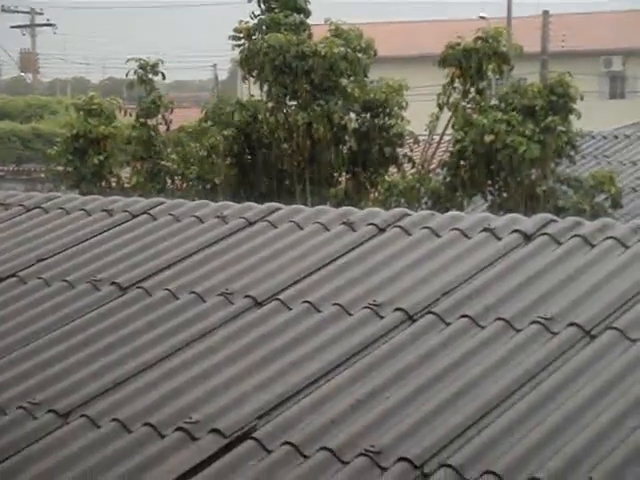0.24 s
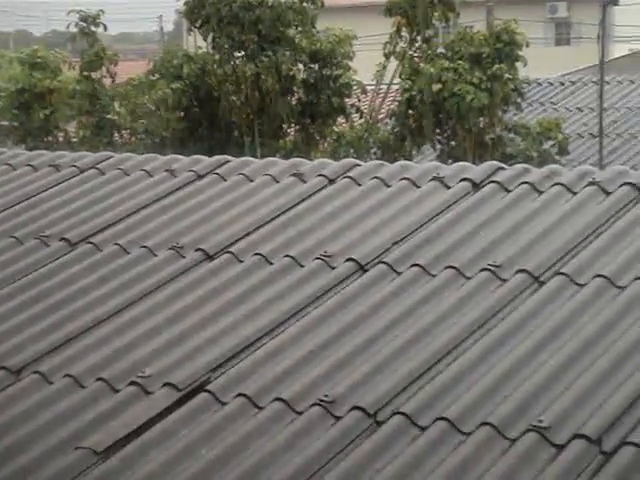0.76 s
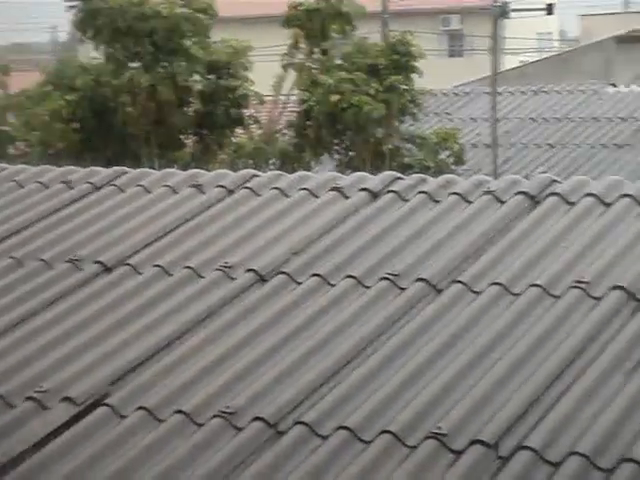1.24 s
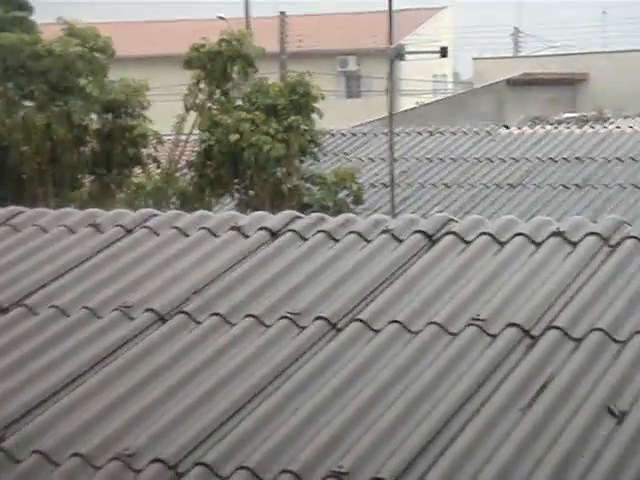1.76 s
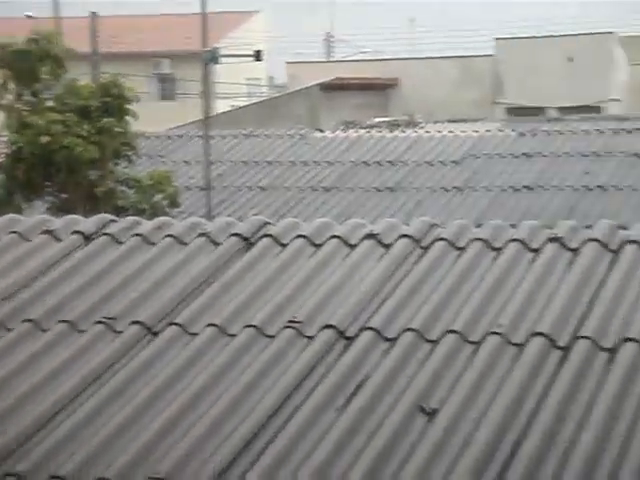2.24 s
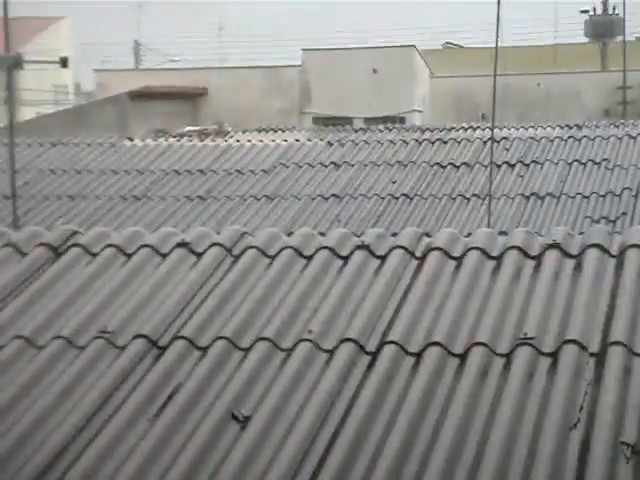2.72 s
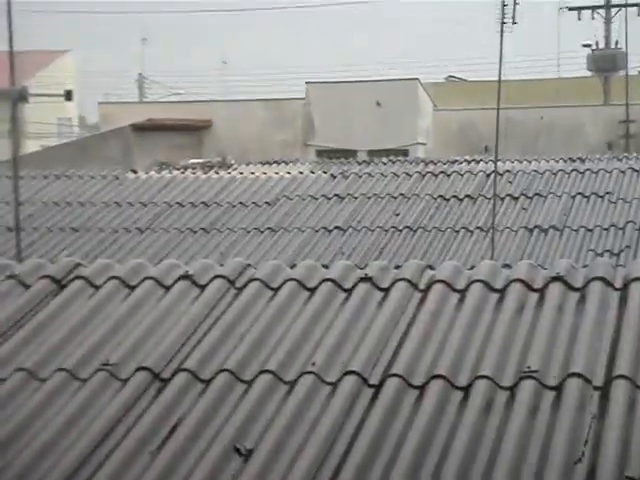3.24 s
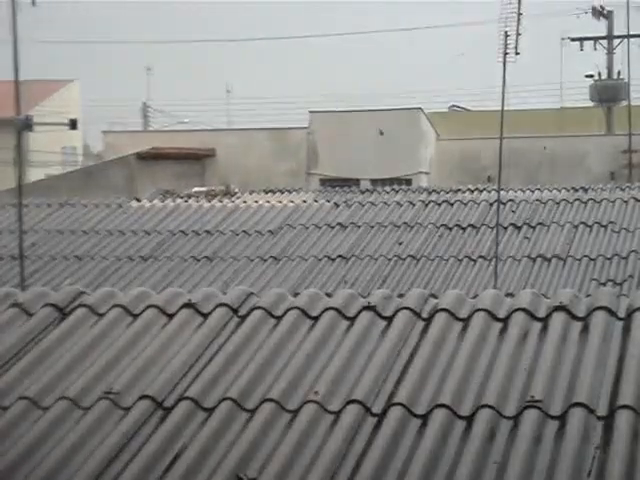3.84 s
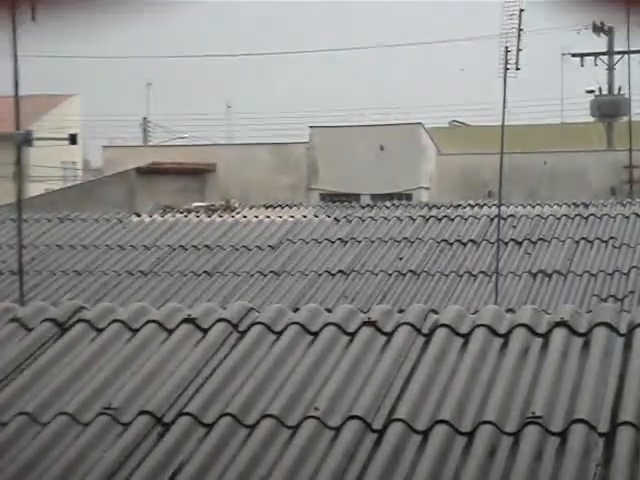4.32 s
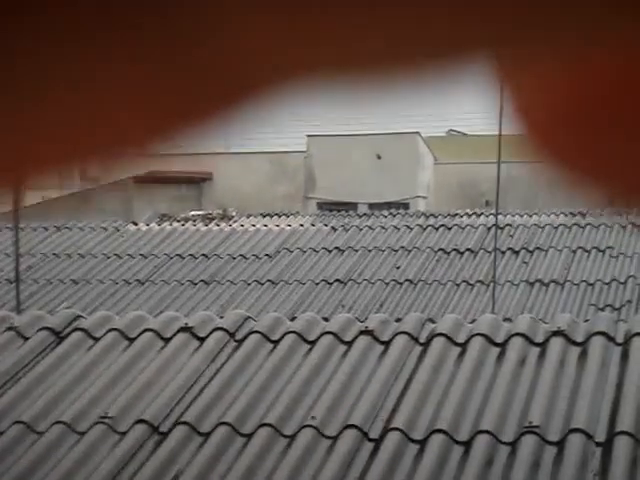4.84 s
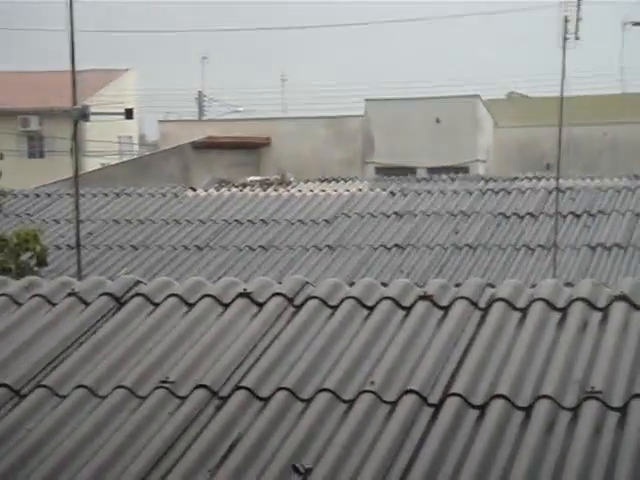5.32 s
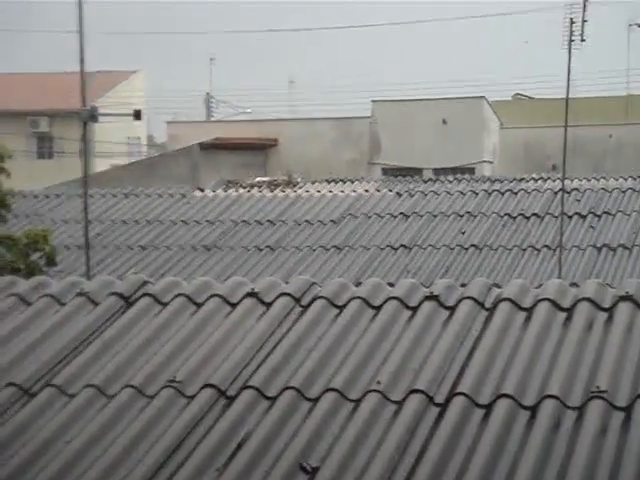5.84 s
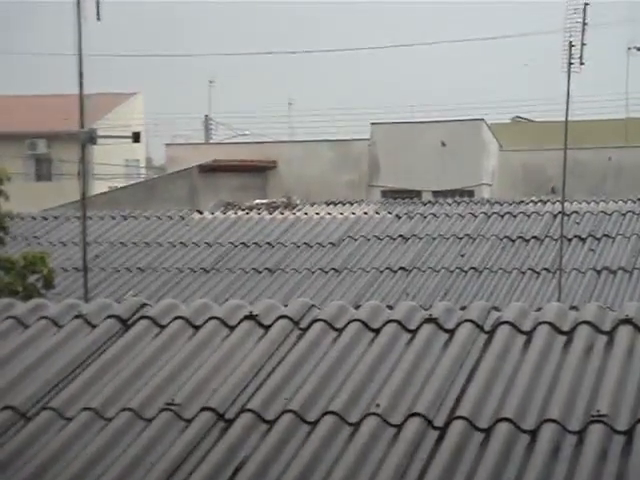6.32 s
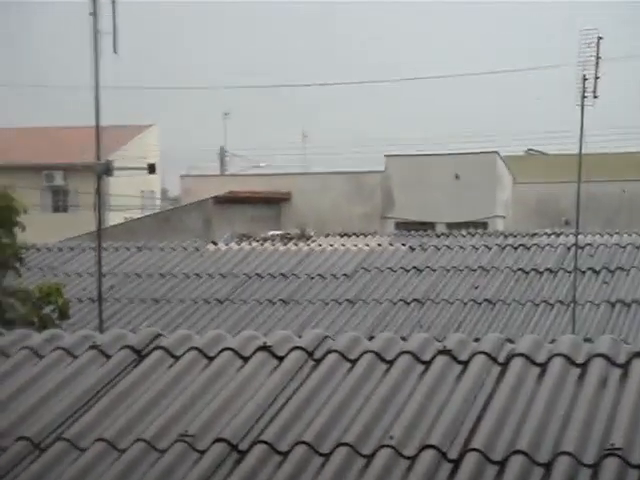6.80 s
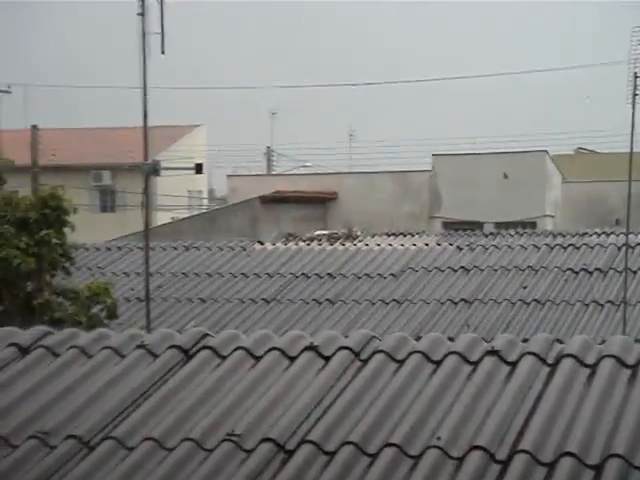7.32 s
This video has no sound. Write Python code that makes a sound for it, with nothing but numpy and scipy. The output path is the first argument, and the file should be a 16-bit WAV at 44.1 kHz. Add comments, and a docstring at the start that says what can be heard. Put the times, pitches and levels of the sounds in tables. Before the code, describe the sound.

Rain falls without pause on corrugated roof sheets, captured through a small, rough camera microphone at a window. From 0 to 2.5 seconds it is a moderate, even wash: far roofs drumming in the middle range with fine hiss above, scattered light ticks, and a very faint low rumble. A hard crack with a body knock lands near 1.4, a softer bump near 1.6, a low distant boom swells around 2.0, and a dull knock follows at 2.2. From about 2.9 to 3.3 the near patter rises quickly, thick and muffled, then brightens until about 4.5. From then to the end at about 7.5 it stays loud, crisp and dense, fluctuating in small spatters, with large drops snapping several times a second as short ringing ticks. Little bumps come near 5.0 and 6.7. Treble flickers; the sharpest peaks clip.

```python
"""Steady rain on corrugated roof sheets, heard from a window by a small camera. The patter on the near sheets,
noise mixed with many tiny damped tones, comes up dull, then bright, as the camera turns. Far roofs drum and
hiss in the same way, and low noise rumbles far off. Large drops crack close by as short ringing ticks; the
microphone's membrane is pushed now and then, and knocks shake the camera. The treble flickers and the loudest
peaks clip."""
import sys
import numpy as np
from scipy import signal
from scipy.fft import rfft, irfft, next_fast_len
from scipy.io import wavfile
from scipy.ndimage import uniform_filter1d, map_coordinates

SR = 44100
rng = np.random.default_rng(int(sys.argv[2]) if len(sys.argv) > 2 else 0)


def generate_wav(signal):
    """Clip the signal to [-1, 1] and save it as 16-bit WAV at the path in sys.argv[1]."""
    frames = np.transpose(np.atleast_2d(signal))
    scaled = np.clip(frames, -1, 1) * 32767
    pcm = np.round(scaled).astype(np.int16)
    wavfile.write(sys.argv[1], SR, pcm)


def rack_gain(trim_db):
    """Turn a fader trim in dB into the linear factor to multiply a signal by."""
    fader = np.asarray(trim_db, float)
    return 10 ** (fader / 20)


N = 333396  # length in samples


def unit(x):
    """Scale to rms 1."""
    return x / np.sqrt(np.mean(x ** 2) + 1e-20)


def curves(rows, t):
    """Read each column after the time at times t, in straight lines between rows."""
    s, *columns = np.transpose(rows)
    return [np.interp(t, s, column) for column in columns]


def wobble(rate):
    """A smooth random curve, with this many random points a second."""
    points = rng.standard_normal(int(N * rate / SR) + 4)
    return map_coordinates(points, [np.arange(N) * rate / SR])


def filtered(x, response):
    """Multiply the spectrum of x by a response, a function of frequency in Hz."""
    m = next_fast_len(N + 8192)
    spectrum = rfft(x, m) * response(np.fft.rfftfreq(m, 1 / SR))
    return irfft(spectrum, m)[..., :N]


def coloured(x, colour):
    """Filter x through pitch and level points, joined on a log pitch axis, then scale to rms 1."""
    f, db = np.transpose(colour)
    return unit(filtered(x, lambda hz: rack_gain(np.interp(np.log(hz + 1), np.log(f), db))))


def splashes(at, size, hz, cycles, width=160):
    """One damped sine per drop: it peaks almost at once and dies away over some cycles of its pitch."""
    turns = hz[:, None] * np.arange(width) / SR
    attack = 1 - np.exp(-3 * turns)
    decay = np.exp(-2 * turns / cycles[:, None])
    wave = np.sin(2 * np.pi * turns) * attack * decay
    wave *= (size / np.abs(wave).max(axis=1))[:, None]
    index = np.round(at * SR).astype(int)[:, None] + np.arange(width)
    return np.bincount(index.ravel(), wave.ravel(), N + 2 * width)[:N]


def shower(count, low_hz, high_hz, cycles, spread_db, wash, patchy_db):
    """Many drops of random pitch, mixed with the noise wash of those too far to tell apart."""
    draw = rng.random((count, 3))
    size = rack_gain(-spread_db * np.log(.01 + draw[:, 1]))
    hz = low_hz * (high_hz / low_hz) ** draw[:, 2]
    drops = splashes(draw[:, 0] * N / SR, size * np.sqrt(hz), hz, np.full(count, cycles))
    share = np.clip(wash, 0, 1)  # the wash's share of the power
    x = np.sqrt(share) * rng.standard_normal(N) + np.sqrt(1 - share) * unit(np.gradient(drops))
    # uneven patches in time and pitch
    z = signal.stft(x, nperseg=256)[2]
    field = uniform_filter1d(rng.standard_normal(z.shape), size=9, axis=0)
    field = uniform_filter1d(field, size=5, axis=1)
    return signal.istft(z * rack_gain(patchy_db * unit(field)), nperseg=256)[1][:N]


def swells(at, db):
    """Gain in dB: a sudden rise as the drops land, a slower fall, a lull on both sides."""
    rise_s, fall_s = .0006, .0095
    lull_s = .14  # drops that bunch leave the rain thinner around them
    u = np.arange(SR // 10) / SR
    shape = (1 - np.exp(-u / rise_s)) * np.exp(-u / fall_s)
    marks = np.bincount(np.round(at * SR).astype(int), db, N)
    swell = signal.fftconvolve(marks, shape / shape.max())[:N]
    return swell - uniform_filter1d(swell, size=round(lull_s * SR))


def clusters():
    """Small spatters at random, of uneven size."""
    per_s, scale_db = 50, 1.4
    draw = rng.random((round(per_s * N / SR), 2))
    size_db = -scale_db * np.log(.1 + .9 * draw[:, 1])
    return swells(draw[:, 0] * (N - 1) / SR, size_db)


# large spatters, when several drops land together: start_s, swell_db (before the lull is taken off)
SPATTER_SWELLS = [(0.607, 4.0), (0.968, 3.0), (0.985, 4.0), (1.119, 3.0), (1.234, 3.0), (1.398, 3.0),
                  (1.584, 6.5), (1.596, 4.5), (1.93, 3.0), (1.965, 3.0), (2.189, 3.5), (2.249, 4.0),
                  (2.561, 4.0), (2.66, 4.0), (2.692, 3.0), (2.714, 3.0), (2.925, 3.0), (2.957, 3.0),
                  (3.107, 4.0), (3.127, 4.5), (3.151, 2.5), (3.485, 4.5), (3.582, 3.0), (3.82, 3.0),
                  (3.848, 3.5), (3.865, 5.5), (3.927, 3.0), (3.966, 5.0), (4.088, 2.5), (4.11, 3.0),
                  (4.158, 3.0), (4.198, 3.0), (4.38, 3.5), (4.405, 3.5), (4.46, 3.0), (4.563, 3.5),
                  (4.585, 4.5), (4.644, 4.0), (5.057, 4.5), (5.079, 5.5), (5.128, 3.0), (5.211, 2.5),
                  (5.247, 3.0), (5.353, 3.0), (5.405, 3.5), (5.466, 2.5), (5.468, 1.5), (5.492, 2.5),
                  (5.527, 3.0), (5.58, 3.5), (5.598, 5.0), (5.776, 3.0), (5.854, 3.5), (5.907, 4.5),
                  (5.981, 3.0), (6.082, 3.5), (6.109, 3.5), (6.139, 3.0), (6.2, 5.0), (6.231, 4.5),
                  (6.296, 3.0), (6.367, 3.0), (6.432, 4.0), (6.58, 3.0), (6.653, 5.5), (6.664, 3.0),
                  (6.693, 2.5), (6.767, 3.0), (6.813, 4.0), (6.831, 3.0), (6.852, 2.5), (6.967, 4.0),
                  (7.009, 3.0), (7.073, 5.5), (7.159, 3.5), (7.192, 3.0), (7.206, 3.5), (7.224, 3.0),
                  (7.285, 2.5), (7.351, 3.0), (7.368, 5.0)]


def spatters(t):
    """Gain in dB of the large spatters."""
    return swells(*np.transpose(SPATTER_SWELLS))


# colour of the distant rumble: pitch_hz, level_db (relative)
RUMBLE_COLOUR = [(12, -12), (30, -11), (50, -12), (65, 3), (85, -5.5), (130, -6.5), (200, -24.5)]


def rumble(t):
    """Low noise from far off, wavering and fading slowly, with one boom."""
    start_db, fade_db_per_s, waver_db = -48.5, 0.2, 3
    boom_s, boom_db, rise_s, fall_s = 2, 16.5, .1, .3
    boom = np.interp(t, [boom_s - rise_s, boom_s, boom_s + fall_s], [0, 1, 0])
    level_db = start_db - fade_db_per_s * t + waver_db * wobble(2.1) + boom_db * boom
    return rack_gain(level_db) * coloured(rng.standard_normal(N), RUMBLE_COLOUR)


# pushes on the microphone's membrane, most as loud drops land: start_s, level_db (scales the push shape)
PUSHES = [(1.3633, -25), (1.5605, -19.5), (2.006, -29), (2.537, -30), (4.001, -25), (4.028, -20),
          (4.11, -34), (4.985, -20), (5.127, -21), (5.49, -29), (5.56, -27), (5.579, -31), (5.6, -27),
          (5.854, -30), (5.905, -29), (5.92, -28), (6.03, -29), (6.048, -27), (6.109, -30), (6.136, -31),
          (6.198, -29), (6.318, -30), (6.43, -26), (6.652, -30), (6.744, -29), (6.81, -31), (6.829, -31),
          (7.071, -30), (7.158, -25.5), (7.366, -35), (7.513, -29)]
# knocks on the camera body: start_s, level_db (scales the knock shape)
BODY_KNOCKS = [(1.3642, -8.5), (1.5597, -17), (2.2325, -10.5), (4.984, -18), (6.7435, -16)]


def jolts():
    """The membrane is pushed and creeps back; a knock shakes the camera body for about one cycle."""
    t = np.arange(SR // 8) / SR
    push = (1 - np.exp(-t / 0.0013)) * np.exp(-t / 0.012) * (1 - t / 0.021)
    turns = 200 * t + .4 * (1 - np.exp(-t / .0006))  # the pitch sinks to 200 Hz as the contact widens
    knock = -np.sin(2 * np.pi * turns) * np.exp(-(t / 0.0034) ** 2)

    def place(rows, shape):
        """Set a scaled copy of the shape at each start."""
        at, db = np.transpose(rows)
        marks = np.bincount(np.round(at * SR).astype(int), rack_gain(db), N)
        return signal.fftconvolve(marks, shape)[:N]

    return place(PUSHES, push), place(BODY_KNOCKS, knock)


# colour of the drumming far sheets: pitch_hz, level_db (relative, per Hz)
DRUM_COLOUR = [(60, -36), (110, -17), (140, -7.5), (185, -12), (270, -4.5), (550, 0), (700, -1), (860, 0.5),
               (1100, -1), (1400, -5), (2000, -10.5), (4000, -21)]
# colour of the hissing spray: pitch_hz, level_db (relative, per Hz)
HISS_COLOUR = [(2500, -26), (4500, -4), (6000, 0.5), (7000, -3), (8500, -7), (10000, -15), (12000, -47)]


def far_roofs(t, gust):
    """The sheets drum in the middle range; the spray hisses above; both swell a little with the near patter."""
    # levels while the camera faces away, and the share of the near patter's rise that each follows
    away_drum_db, drum_follows = -22, 0.024
    away_hiss_db, hiss_follows = -27, 0.34
    rise_db = curves(NEAR_PATTER, t)[0] - NEAR_PATTER[0][1]
    drum = shower(count=9000, low_hz=491, high_hz=2424, cycles=3.25, spread_db=1.0, wash=0.9, patchy_db=-0.33)
    hiss = shower(count=5000, low_hz=3960, high_hz=9940, cycles=2.9, spread_db=-1.5, wash=0.75, patchy_db=-0.06)
    drum_db = away_drum_db + drum_follows * rise_db + 0.67 * wobble(2.5)
    drum_db = drum_db + 0.77 * gust + .5 * spatters(t)
    hiss_db = away_hiss_db + hiss_follows * rise_db + 1.1 * wobble(2.3) + 0.34 * wobble(12)
    hiss_db = hiss_db + .5 * gust + 1.0 * spatters(t)
    return rack_gain(drum_db) * coloured(drum, DRUM_COLOUR) + rack_gain(hiss_db) * coloured(hiss, HISS_COLOUR)


TICK_S = .00037  # every tick dies away over this time, whatever its pitch


def lesser_drops():
    """Smaller ticks at random, a few dozen a second, their peaks standing over the near patter."""
    per_s, most_db, low_hz, high_hz = 24, 8, 2500, 7500
    draw = rng.random((round(per_s * N / SR), 3))
    at = draw[:, 0] * N / SR
    hz = low_hz * (high_hz / low_hz) ** draw[:, 1]
    peak_db = curves(NEAR_PATTER, at)[0] + most_db - 5.3 * draw[:, 2]
    return splashes(at, -rack_gain(peak_db), hz, TICK_S * hz)


# large drops landing close by, and the sharp crack that opens the knocks at 1.365 s and 1.561 s: start_s,
# level_db (peak of the tick alone), pitch_hz
BIG_DROPS = [(0.5994, -7.0, 5600), (0.7241, -5.0, 7040), (0.9838, -7.5, 4530), (1.365, -8, 1550),
             (1.371, 2.5, 2800), (1.5608, -11, 750), (1.5822, -8.5, 4310), (1.5862, -9, 4440),
             (1.5965, -4.5, 5500), (2.1884, -9, 2500), (2.5611, -8, 1590), (2.6573, -6.0, 2300),
             (3.1061, -7, 1810), (3.1289, -7, 1850), (3.4846, -6, 1980), (3.6039, -6, 2150),
             (3.6913, -6, 2330), (3.8188, -5, 2630), (3.8646, -2.0, 3250), (3.8856, -5, 1940),
             (3.9542, -4, 1890), (3.9657, -3.5, 3220), (4.028, -5.0, 7000), (4.0876, -3.5, 4540),
             (4.11, -1.5, 3410), (4.2015, -4, 3750), (4.293, -3, 4050), (4.3001, -4, 6720),
             (4.4048, -3.5, 3920), (4.584, 0.0, 3420), (4.6441, -2.0, 3400), (4.887, -3, 2970),
             (4.914, -3, 5040), (4.9845, 0.0, 1810), (5.079, -2.5, 3390), (5.1283, -2.5, 4900),
             (5.2481, -3.5, 2240), (5.3525, -2.5, 3400), (5.404, -3.0, 4300), (5.4905, -1.5, 4500),
             (5.5793, -2.5, 4390), (5.5967, -3.5, 2760), (5.775, -3.5, 4310), (5.8536, -1.0, 3430),
             (5.9077, -4, 3140), (6.0303, -2.5, 3320), (6.0488, -1.0, 4070), (6.1088, -2.5, 3420),
             (6.1407, -2.5, 2030), (6.1955, -3.5, 4600), (6.1998, -0.5, 3760), (6.23, -1.0, 3460),
             (6.318, -4.0, 7300), (6.3661, -5, 3750), (6.371, -9, 9000), (6.4317, -1.5, 3470),
             (6.4954, -4.5, 4180), (6.5008, -4.0, 2270), (6.578, -3, 2760), (6.6531, 0, 3200),
             (6.6911, -3, 3960), (6.783, -2.5, 5200), (6.811, -1.5, 4800), (6.8295, -1.5, 5600),
             (6.968, -2.0, 2820), (7.03, -3.5, 4690), (7.072, -3.0, 2910), (7.0748, -3, 3320),
             (7.114, -3.5, 2240), (7.159, -2.5, 4180), (7.1693, -2.5, 5340), (7.176, -3, 5860),
             (7.2834, -3, 4130), (7.3432, -2.5, 3700), (7.3507, -2.0, 3240), (7.3679, 0.0, 3140),
             (7.4342, -3.5, 5430), (7.5153, -3.0, 4720)]


def large_drops():
    """A sharp tick at the drop's pitch and its short ring over a thud, then a few ms of splash."""
    ring_db, ring_s = -9, .0018  # ring level against the tick, for high drops
    dry_hz = 2900  # well below this pitch a drop hardly rings
    at, db, hz = np.transpose(BIG_DROPS)
    tick = splashes(at - .5 / hz, -rack_gain(db), hz, TICK_S * hz)
    # the sheet drums
    thud = splashes(at - .0003, rack_gain(db - 12.5), np.full(len(at), 900), np.full(len(at), 2.5))
    ring_size = rack_gain(db + ring_db) / (1 + (dry_hz / hz) ** 12)
    ring = splashes(at + .5 / hz, -ring_size, hz, ring_s * hz, width=240)
    # six droplets splash after each drop
    draw = rng.random((len(at), 6, 2))
    later = (at[:, None] + .0006 + 0.0066 * draw[..., 0]).ravel()
    pitch = (hz[:, None] * np.exp(1.1 * (draw[..., 1] - .5))).ravel()
    splash = splashes(later, np.repeat(rack_gain(db - 28.0), 6), pitch, np.full(len(later), 4.5))
    return tick + ring + thud + splash


# near patter as the camera turns to it: start_s, level_db (before shading and swells),
# edge_hz (pitch up to which it reaches the microphone)
NEAR_PATTER = [(0, -24.5, 7500), (2.5, -25, 6700), (2.8, -24.5, 4970), (2.95, -22, 3060), (3.12, -18, 2720),
               (3.28, -18, 2850), (3.45, -17, 3480), (3.65, -18.5, 3600), (3.85, -18, 4900),
               (4.1, -16.5, 7000), (4.5, -16, 9100), (4.85, -16.5, 9000), (5.45, -15, 9000),
               (5.7, -16.5, 9000), (6.05, -15.5, 9000), (6.55, -18, 9000), (6.85, -15.5, 9000),
               (7.56, -16, 9000)]
# colour of the near patter: pitch_hz, level_db (relative, per Hz)
PATTER_COLOUR = [(500, -25), (1200, -4), (1600, -1.5), (3000, 0.5), (5300, -2.5), (7000, -10), (9000, -33),
                 (12000, -40)]


def near_sheets(t, gust):
    """Drops patter on the sheets; the window edge shades their treble until the camera faces them."""
    patter = shower(count=7000, low_hz=1210, high_hz=7500, cycles=3.1, spread_db=0.0, wash=0.87, patchy_db=-0.67)
    hz, when, z = signal.stft(coloured(patter, PATTER_COLOUR), SR, nperseg=512)
    edge_hz = curves(NEAR_PATTER, when)[1]
    shade = 1 / np.sqrt(1 + (hz[:, None] / edge_hz) ** 8)
    shaded = signal.istft(z * shade, SR, nperseg=512)[1][:N]
    return rack_gain(curves(NEAR_PATTER, t)[0] + 1.0 * gust) * shaded


def scene():
    """All the sounds at one microphone; the same small clusters swell the rain near and far."""
    t, gust = np.arange(N) / SR, clusters()
    rain = far_roofs(t, gust) + rack_gain(spatters(t)) * near_sheets(t, gust)
    push, knock = jolts()
    deafness = np.exp(-9 * np.abs(push))  # a membrane off its centre hears less of the rain
    return (deafness * rain + rumble(t) + large_drops() + lesser_drops() + push + knock)[None]


def flicker(x, above_hz, rarity, depth_db):
    """Patches of the treble, about 10 ms by 1 kHz, drop out now and then."""
    hz, _, z = signal.stft(x, SR, nperseg=256)
    field = uniform_filter1d(rng.standard_normal(z.shape), size=6, axis=-2)
    field = uniform_filter1d(field, size=3, axis=-1)
    treble = np.clip((hz - above_hz) / 900, 0, 1)[:, None]
    dips = np.clip(unit(field) - rarity, 0, 1) * treble
    return signal.istft(z * rack_gain(-depth_db * dips), SR, nperseg=256)[1][..., :N]


def roll_off(x):
    """The treble ends steeply here."""
    return signal.sosfilt(signal.butter(12, 10200, fs=SR, output="sos"), x)


def record(dry):
    """The treble flickers and stops at the camera's band limit; the highest peaks clip."""
    top_hz = 10200
    unsteady = flicker(dry, above_hz=4580, rarity=0.64, depth_db=53.0)
    kept = filtered(unsteady, lambda hz: np.clip((top_hz - hz) / 200, 0, 1))
    finished = np.clip(kept, -1, 1)
    return roll_off(finished)


dry = scene()
out = record(dry)
generate_wav(out)
```